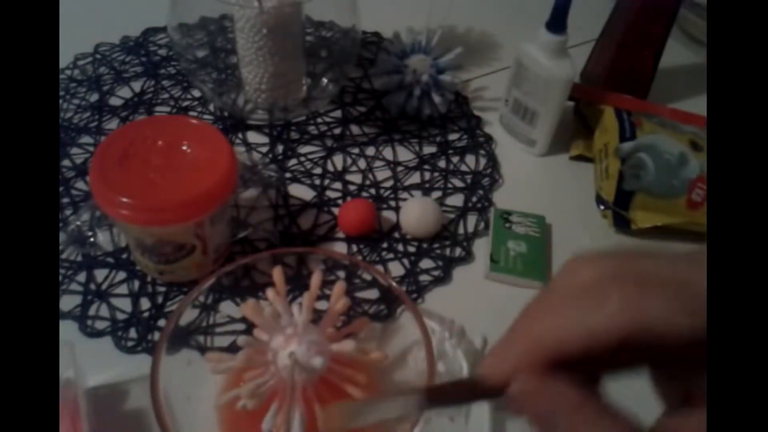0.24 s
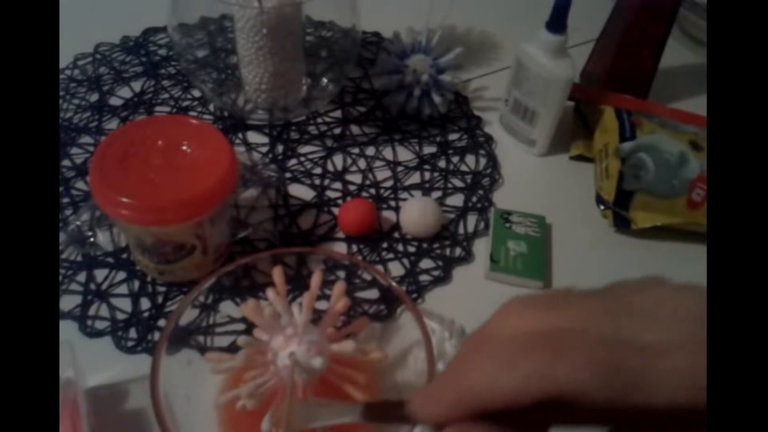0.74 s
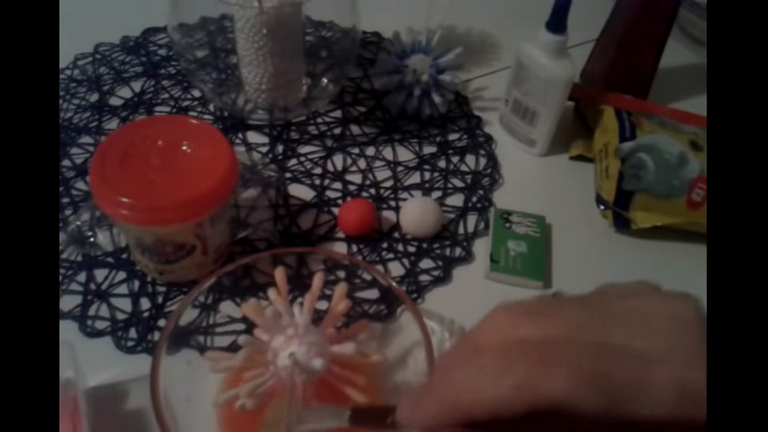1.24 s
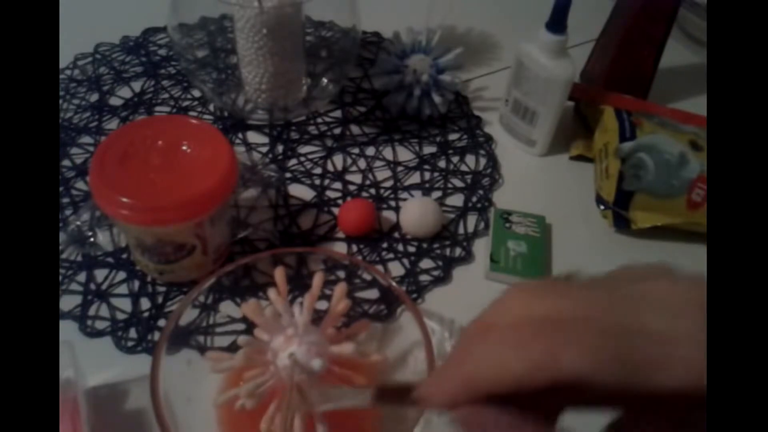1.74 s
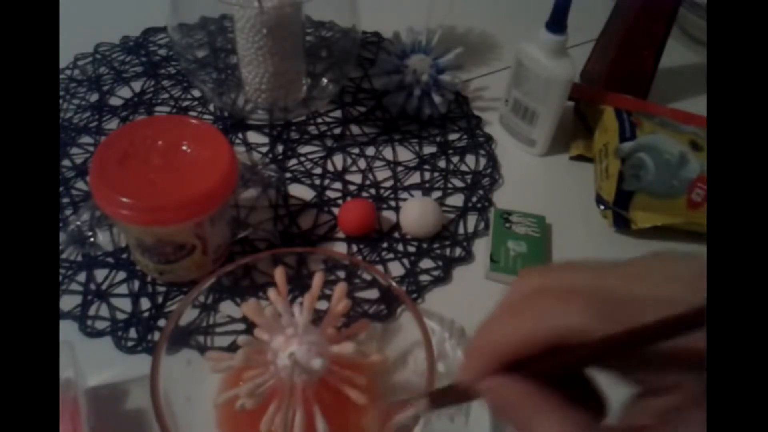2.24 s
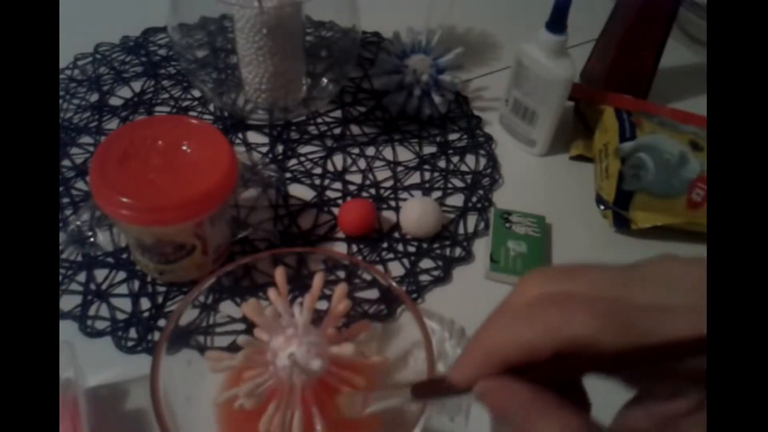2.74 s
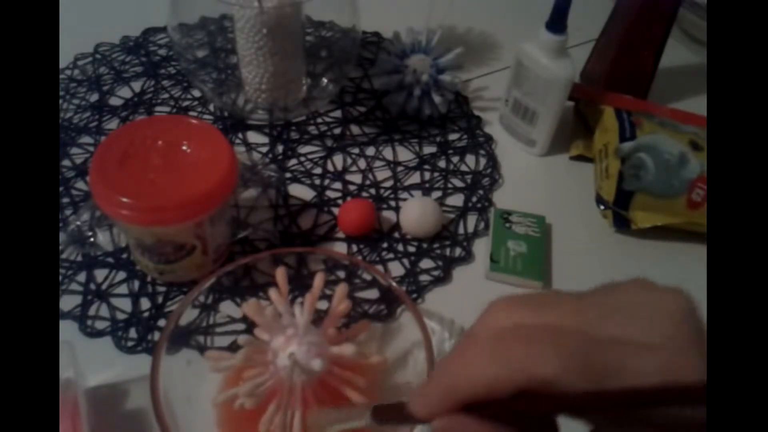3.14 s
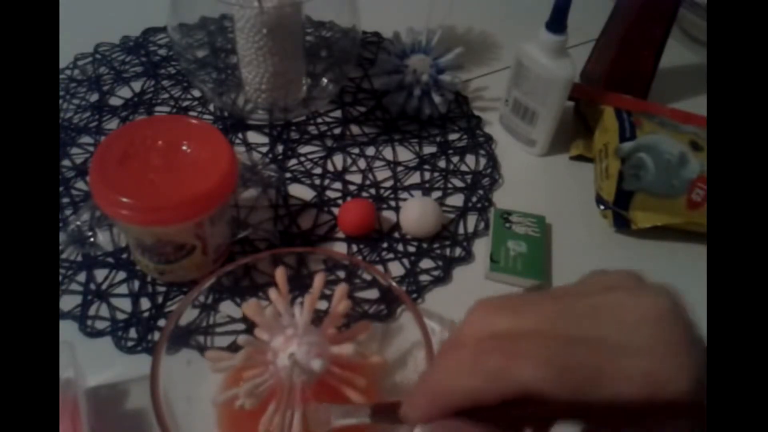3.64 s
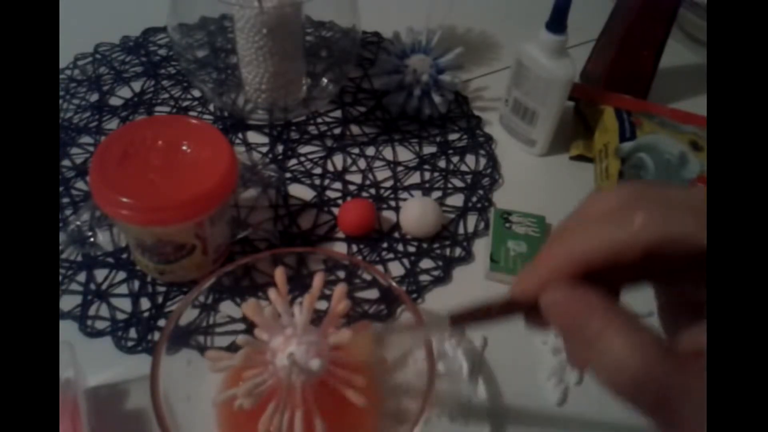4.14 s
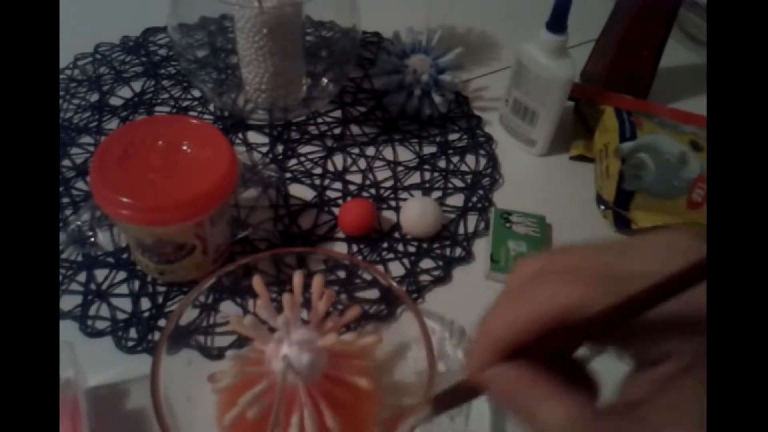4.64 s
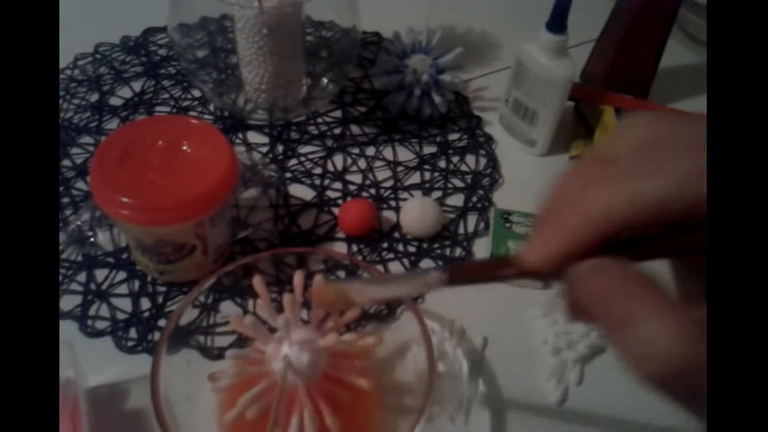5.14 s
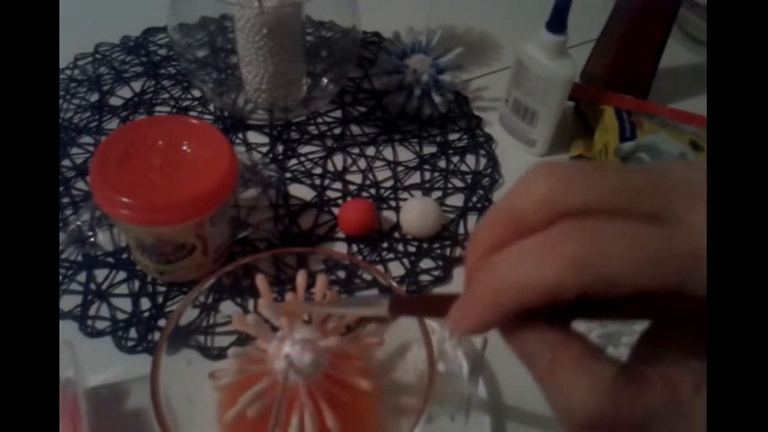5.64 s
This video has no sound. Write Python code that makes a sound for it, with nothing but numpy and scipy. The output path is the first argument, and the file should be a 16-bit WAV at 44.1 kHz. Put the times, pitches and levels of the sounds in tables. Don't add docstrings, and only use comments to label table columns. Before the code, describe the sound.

A close paintbrush makes short, soft, bright swishes at a glass bowl in a small quiet room. A sharp dry tick comes past the middle, then a cluster of fainter ticks, then one loud chattering glass clink that rings briefly and shimmers. A few last swishes follow. A distant clock ticks each second over thin microphone hiss, low rumble and a faint insect-like trill.

```python
import sys
import numpy as np
from scipy import signal
from scipy.fft import rfft, irfft, next_fast_len
from scipy.io import wavfile

SR = 44100
rng = np.random.default_rng(int(sys.argv[2]) if len(sys.argv) > 2 else 0)


def unload_wav(signal):
    wavfile.write(
        sys.argv[1],
        SR,
        np.round(np.clip(np.atleast_2d(signal).T, -1, 1) * 32767).astype(np.int16),
    )


def natural_amplitude(level_db):
    exponent = np.asarray(level_db, float) / 20
    return 10 ** exponent


N = 259308
STEADY_TOP_HZ = 15850


def rms_one(x):
    return x / np.sqrt(np.mean(x ** 2) + 1e-20)


def coloured(x, spectrum):
    size = next_fast_len(N)
    hz = np.maximum(np.arange(size // 2 + 1) * SR / size, 1)
    point_hz, point_db = np.transpose(spectrum)
    gain = natural_amplitude(np.interp(np.log(hz), np.log(point_hz), point_db, left=-90))
    gain = gain * (hz < STEADY_TOP_HZ)
    return rms_one(irfft(rfft(x, size) * gain, size)[:N])


def coloured_noise(spectrum):
    return coloured(rng.standard_normal(N), spectrum)


def drift(rate_hz):
    r = np.exp(-2 * np.pi * rate_hz / SR)
    white = rng.standard_normal(N + SR)
    return rms_one(signal.lfilter([1], [1, -2 * r, r * r], white)[SR:])


def resonance(x, hz, width_hz):
    r = np.exp(-np.pi * width_hz / SR)
    feed = np.array([1, 0, -1]) * (1 - r * r) / 2
    return signal.lfilter(feed, [1, -2 * r * np.cos(2 * np.pi * hz / SR), r * r], x)


def swell(start_s, rise_s, length_s, shape):
    out, first = np.zeros(N), int(start_s * SR) + 1
    t = np.arange(first, min(N, first + int(8 * length_s * SR))) / SR - start_s
    rise = 1 - np.exp(-t / max(rise_s, 1e-4))
    out[first:first + len(t)] = rise * np.exp(-(t / length_s) ** shape * 2)
    return out


def dying(start_s, rise_s, t60_s):
    return swell(start_s, rise_s, t60_s * 2 / np.log(1000), shape=0.96)


# time in seconds, level in dB.
GATE_BREATH = [(0, -61), (.3, -61.5), (.41, -66.5), (.55, -62), (.73, -66), (1.05, -63), (1.6, -63),
               (1.84, -63.5), (2.2, -63), (2.9, -62.5), (3.15, -62), (3.47, -63), (3.82, -63.5),
               (4.15, -61.5), (4.48, -65.5), (5.25, -61.5), (5.43, -67), (5.88, -63)]


def gate(stroke):
    opens_db, knee_db, lag_s = 3, -52, .03
    time_s, breath_db = np.transpose(GATE_BREATH)
    keep = np.exp(-1 / (lag_s * SR))
    lagged = signal.lfilter([1 - keep], [1, -keep], stroke + 1e-18)
    opening = lagged / (lagged + natural_amplitude(knee_db))
    return np.interp(np.arange(N) / SR, time_s, breath_db) + opens_db * opening


# frequency in Hz, density in dB per Hz.
HISS_SPECTRUM = [(350, -23), (600, -9.5), (642, -12.5), (697, -9.5), (868, -13.5), (905, -12.5),
                 (1500, -11), (1890, -10.5), (4800, -10), (6760, -5.5), (7340, -1), (8530, -6.5),
                 (15800, -8)]


def hiss(gate_db):
    return natural_amplitude(gate_db + 3.5 + 0.8 * drift(11.0)) * coloured_noise(HISS_SPECTRUM)


# frequency in Hz, density in dB per Hz.
RUMBLE_SPECTRUM = [(24, -37), (40, -4), (54, -4.5), (76, -11), (131, 2.5), (166, -6), (194, 0.5), (225, -4),
                   (292, -0.5), (413, -5), (577, -6.5), (642, -12), (1500, -12.5), (1950, -38.5),
                   (3300, -120)]
# start in seconds, level in dB over the rumble, length in seconds.
HAND_SHIFTS = [
    (0.248, 2.5, 0.19),
    (1.55, 3, 0.11),
    (2.596, 3.5, 0.17),
    (3.24, 6.5, 0.24),
    (4.202, 4, 0.18),
    (5.123, 1, 0.36),
    (5.49, 6, 0.15),
]


def rumble(swing_db):
    mean_db, gate_share = -71.5, .4
    stirred_db = sum(2 * db * swell(s, 0.068, length_s, shape=1.35) for s, db, length_s in HAND_SHIFTS)
    level_db = mean_db + gate_share * swing_db + 0.65 * drift(4) + stirred_db
    return natural_amplitude(level_db) * coloured_noise(RUMBLE_SPECTRUM)


def hum():
    mains_hz, level_db = 48.7, -90
    return natural_amplitude(level_db + 2.1 * drift(2.5)) * np.sin(2 * np.pi * mains_hz * np.arange(N) / SR)


# frequency in Hz, width in Hz, level in dB.
INSECT_BANDS = [(7110, 55, 2.5), (7300, 60, -22.5), (7540, 110, -6), (8060, 38, -2), (5620, 50, -11.5)]


def insect(swing_db):
    mean_db, gate_share = -70.5, 2.1
    white, trill = rng.standard_normal(N), np.zeros(N)
    for hz, width_hz, db in INSECT_BANDS:
        band = resonance(resonance(white, hz, width_hz), hz, width_hz)
        trill += natural_amplitude(db) * rms_one(band)
    return natural_amplitude(mean_db + gate_share * swing_db + 2.5 * drift(8.5)) * trill


def room_tone(stroke):
    gate_db = gate(stroke)
    swing_db = gate_db - gate_db.mean()
    return hiss(gate_db) + rumble(swing_db) + hum() + insect(swing_db)


# start in seconds, peak in dB, length in seconds.
BRUSH_STROKES = [(0.08, -40, 0.035), (0.213, -37.5, 0.019), (0.252, -44.5, 0.12), (0.44, -47.5, 0.05),
                 (0.537, -41, 0.051), (0.763, -41.5, 0.058), (0.892, -35.5, 0.082), (1.117, -38.5, 0.096),
                 (1.172, -35.5, 0.074), (1.38, -36.5, 0.046), (1.443, -30.5, 0.056), (1.53, -36, 0.058),
                 (1.742, -32, 0.041), (2.023, -30, 0.043), (2.297, -43, 0.059), (1.94, -44, .08),
                 (2.42, -44, .09), (4.52, -40, .12), (5.49, -44, .06), (2.512, -30.5, 0.1),
                 (3.205, -40, 0.11), (3.536, -35, 0.041), (3.648, -39.5, 0.091), (3.704, -44, 0.043),
                 (3.917, -33, 0.053), (4.226, -33, 0.1), (4.298, -39.5, 0.081), (4.369, -34, 0.063),
                 (5.536, -35, 0.09), (5.633, -37, 0.075)]


def strokes():
    rise_share = .14
    return sum(natural_amplitude(db - 13.0) * swell(s, rise_share * length_s, length_s, shape=1.32)
               for s, db, length_s in BRUSH_STROKES)


# frequency in Hz, density in dB per Hz.
BRISTLE_SPECTRUM = [(880, -30), (1500, -18.5), (1740, -14), (2500, -23), (2960, -18), (5240, -12),
                    (6380, -10), (7180, -3), (8330, -2), (9280, -10), (15800, -15)]


def bristles(stroke):
    slips = rng.standard_normal(N) * natural_amplitude(1.2 * rng.exponential(1, N))
    return stroke * coloured(slips, BRISTLE_SPECTRUM)


# frequency in Hz, density in dB per Hz.
CLOCK_SPECTRUM = [(180, -43), (300, -25), (489, -12), (598, -9), (704, -11.5), (1100, -6), (1470, -12),
                  (1710, -4), (2430, -9.5), (6000, -13), (7800, -35), (13200, -120)]
CLOCK_PEAKS_DB = [-44, -43, -38.5, -44, -44.5, -45.5]


def clock():
    first_s, period_s, smear_s = 0.5044, 1.003, 0.12
    smear = sum(natural_amplitude(db - 10) * swell(first_s + k * period_s, 0.039, smear_s, shape=2.1)
                for k, db in enumerate(CLOCK_PEAKS_DB))
    return smear * coloured_noise(CLOCK_SPECTRUM)


# frequency in Hz, width in Hz.
TICK_RESONANCES = [(2600, 3100), (7700, 2800), (12500, 9000)]
# time in seconds, peak in dB, top part in dB over the peak.
DRY_TICKS = [(1.396, -40, -2), (2.0287, -25.5, 5), (2.0306, -33, -18), (3.223, -57, -3), (3.324, -27, -13),
             (3.3264, -10.5, 5), (3.3274, -24, -1), (3.331, -30, 4), (4.2411, -28, 1.5), (4.2445, -37, 3),
             (4.2533, -26, -1.5), (4.2563, -35, 1.5), (4.2608, -31, -5), (4.3855, -32, -1),
             (4.3918, -31, -7), (4.3982, -34, -15), (4.7042, -4.5, -25), (4.7336, -16, -17),
             (4.741, -15, -28), (4.7452, -18, -27.5), (4.750, -15, -23), (4.7605, -17, -26)]


def ticks():
    low_db = -19.5
    time_s, peak_db, top_db = np.transpose(DRY_TICKS)
    levels_db = [peak_db + low_db, peak_db, peak_db + top_db]
    out = np.zeros(N)
    for (hz, width_hz), level_db, sign in zip(TICK_RESONANCES, levels_db, [1, 1, -1]):
        clicks = np.full(N, 1e-18)
        clicks[(time_s * SR).astype(int)] = natural_amplitude(level_db + 9.0) * SR / (2 * np.pi * width_hz)
        out += sign * resonance(resonance(clicks, hz, width_hz), hz, 0.53 * width_hz)
    return out


def rattle():
    level_db, t60_s = -22.5, 0.015
    buzz = sum(natural_amplitude(db + level_db + 0.4 * top_db) * dying(s, 0.00061, t60_s) for s, db, top_db in DRY_TICKS)
    return buzz * coloured_noise([(300, -15), (1000, -7.5), (4000, -9.5), (8000, -2), (15800, -4.5)])


def room(x):
    level_db, t60_s, treble_t60_s, wall_s, split_hz = -34, .33, 0.28, .0088, 10500
    t = np.arange(SR // 2) / SR
    wall = 1 + .45 * (t < wall_s + .003)
    white = rng.standard_normal(len(t)) * natural_amplitude(-60 * t / t60_s) * (t > wall_s) * wall
    dull = signal.sosfilt(signal.butter(4, split_hz, fs=SR, output="sos"), white)
    bright = signal.sosfilt(signal.butter(4, split_hz, "high", fs=SR, output="sos"), white)
    tail = natural_amplitude(-1.5) * dull + bright * natural_amplitude(-4.5 - 60 * t / treble_t60_s)
    return signal.fftconvolve(x, natural_amplitude(level_db) * tail)[:N]


# start in seconds, peak in dB, pitch in Hz, t60 in seconds.
TABLE_KNOCKS = [(1.42, -62.5, 359, 0.31), (3.261, -77, 310, 0.22), (3.327, -51.5, 293, 0.081),
                (3.326, -56, 70, 0.044), (3.325, -58, 880, 0.03), (4.25, -64, 300, 0.26),
                (4.7045, -38.5, 502, .07), (4.735, -44.5, 490, .12), (4.742, -44, 900, 0.16),
                (4.749, -55.5, 109.6, .45), (5.13, -66, 140, .6), (5.54, -60, 367, .3)]


def knocks():
    t = np.arange(N) / SR
    return sum(natural_amplitude(db) * dying(s, 0.0011, t60_s) * np.sin(2 * np.pi * hz * (t - s))
               for s, db, hz, t60_s in TABLE_KNOCKS)


# frequency in Hz, partner frequency in Hz.
MODE_PAIRS = [(2321, 2348), (4134, 4165), (6374, 6437), (8986, 8920), (11938, 11905), (15218, 15180)]
# partner in dB, both in dB, extra loss in dB per second.
MODE_LEVELS = [(-3, -17, 0), (-5.5, -1.5, 0.5), (-13.5, 0.5, -4.5), (-4.5, 2, 0), (-7.5, -15.5, 37),
               (-7, -19.5, 80)]
# start in seconds, main mode in dB, length in seconds,
# lower modes in dB over the main, upper modes in dB over the main.
FERRULE_TOUCHES = [
    (4.7024, -8.5, 0.0082, -23, -23),
    (4.709, -9, 0.023, -17.5, -15.5),
    (4.733, -10.5, 0.02, -21.5, -13),
    (4.746, -12.5, 0.013, -13.5, -23),
    (4.756, -11.5, 0.036, -16, -17.5),
]
# start in seconds, level in dB, length in seconds.
MAIN_BEATS = [
    (4.789, -20.5, 0.029),
    (4.804, -16.5, 0.047),
    (4.849, -30.5, 0.03),
    (4.877, -33.5, 0.056),
    (4.932, -43, 0.051),
    (4.985, -57, 0.09),
]
# level at lift in dB, t60 in seconds.
FREE_RING = [(-44, 0.42), (-36.5, .36), (-32, .32)]


def bowl():
    in_step_s, lift_s = 4.712, 4.78
    start_s, main_db, length_s, lower_db, upper_db = np.transpose(FERRULE_TOUCHES)
    touches = np.array([swell(s, .001, length, shape=3.5) for s, length in zip(start_s, length_s)])
    beats = sum(natural_amplitude(db) * swell(s, .008, length, shape=3.5) for s, db, length in MAIN_BEATS)
    main = natural_amplitude(main_db) @ touches + beats
    lower = natural_amplitude(main_db + lower_db) @ touches
    upper = natural_amplitude(main_db + upper_db) @ touches
    low_free, second_free, upper_free = [natural_amplitude(db) * dying(lift_s, .006, t60_s) for db, t60_s in FREE_RING]
    touched = [lower, lower, main, upper, upper, upper]
    free = [low_free, second_free, 0, upper_free, upper_free, upper_free]

    after = np.maximum(np.arange(N) / SR - in_step_s, -.01)
    struck = int(in_step_s * SR)
    out = np.zeros(N)
    for k, ((hz, partner_hz), (partner_db, both_db, loss_db_per_s)) in enumerate(zip(MODE_PAIRS, MODE_LEVELS)):
        slow, partner_slow = drift(20), drift(12.7)
        waver_rad = 0.9 * (slow - slow[struck])
        partner_waver_rad = 0.9 * (partner_slow - partner_slow[struck])
        pair = np.sin(2 * np.pi * hz * after + waver_rad)
        pair += natural_amplitude(partner_db) * np.sin(2 * np.pi * partner_hz * after + partner_waver_rad)
        free_gain = natural_amplitude(both_db) if k > 2 else 1
        envelope = natural_amplitude(both_db) * touched[k] + free_gain * free[k]
        out += envelope * natural_amplitude(-loss_db_per_s * after) * pair
    return out


# frequency in Hz, density in dB per Hz.
CLANG_SPECTRUM = [(60, -39.5), (300, -25.5), (1400, -28.5), (2300, -20.5), (3400, -21), (5400, -19),
                  (6400, -12), (7000, -8), (8000, -6.5), (9300, -18.5), (10200, -30), (13000, -35.5),
                  (15800, -39)]
# start in seconds, level in dB, t60 in seconds.
SHAKING_BLOWS = [
    (4.7027, -22.5, 0.025),
    (4.7045, -29.5, 0.56),
    (4.729, -21.5, .12),
    (4.745, -28.5, 0.47),
]


def clang():
    power = sum((natural_amplitude(db) * dying(s, 0.00079, t60_s)) ** 2 for s, db, t60_s in SHAKING_BLOWS)
    return np.sqrt(power) * coloured_noise(CLANG_SPECTRUM)


def scene():
    stroke = strokes()
    tick = ticks() + rattle()
    ring = bowl()
    near = bristles(stroke) + tick + knocks() + ring + clang()
    return (near + room(tick + natural_amplitude(-20) * ring) + clock() + room_tone(stroke))[None]


def roll_off(x):
    return signal.sosfilt(signal.butter(12, 17010, fs=SR, output="sos"), x)


def record(dry):
    stop_hz = 17000
    mix = signal.sosfilt(signal.cheby2(10, 50, stop_hz, fs=SR, output="sos"), dry)
    return roll_off(mix)


dry = scene()
out = record(dry)
unload_wav(out)
```